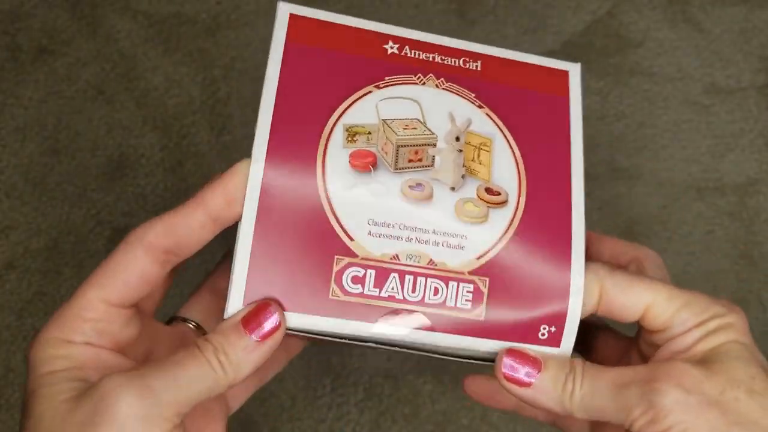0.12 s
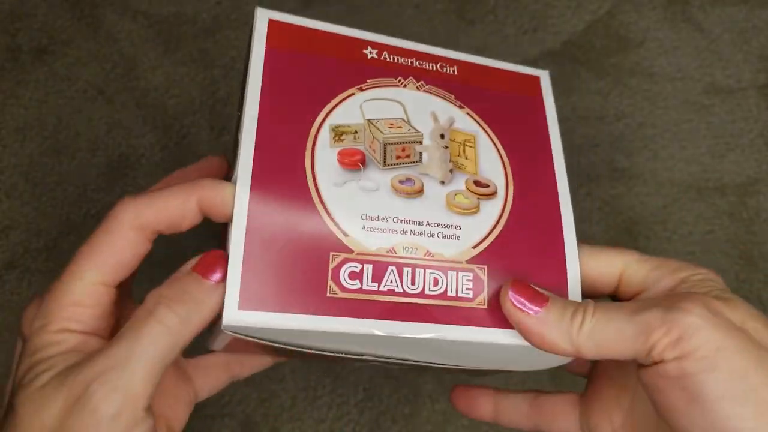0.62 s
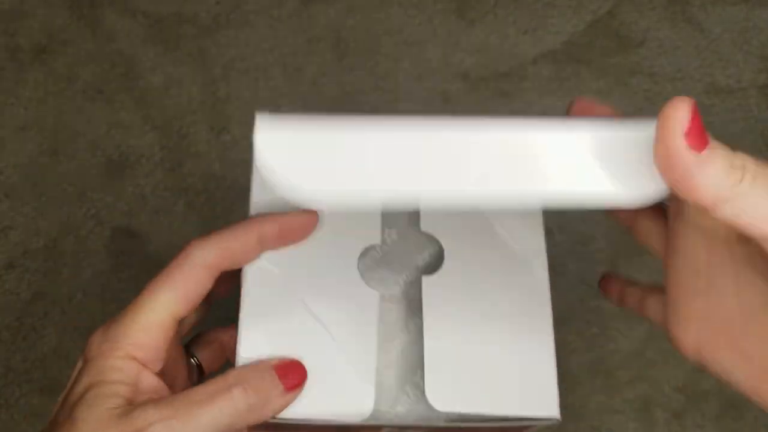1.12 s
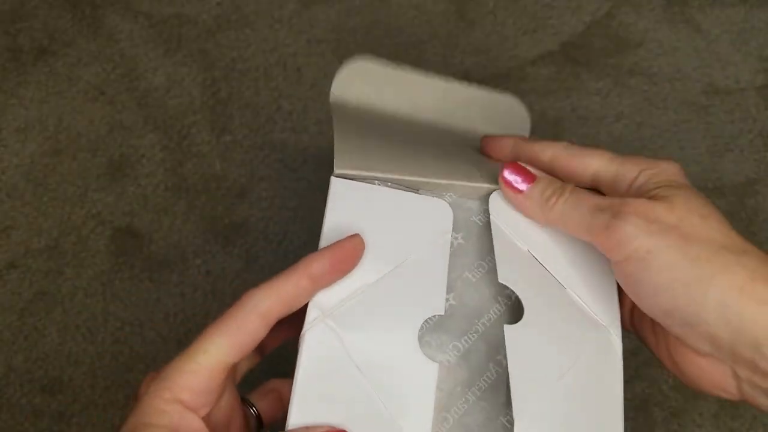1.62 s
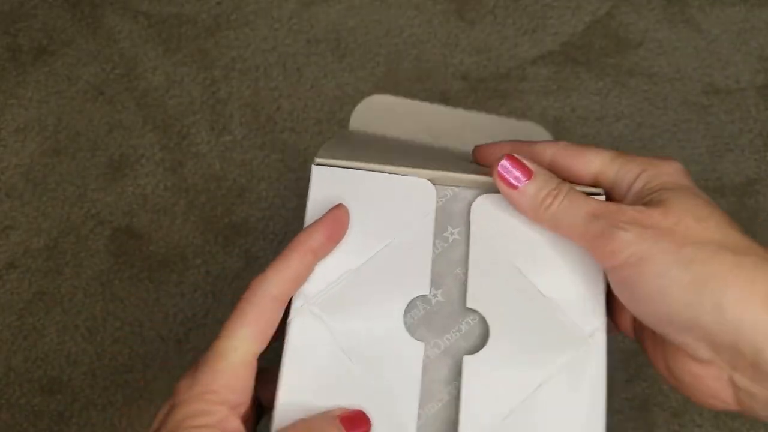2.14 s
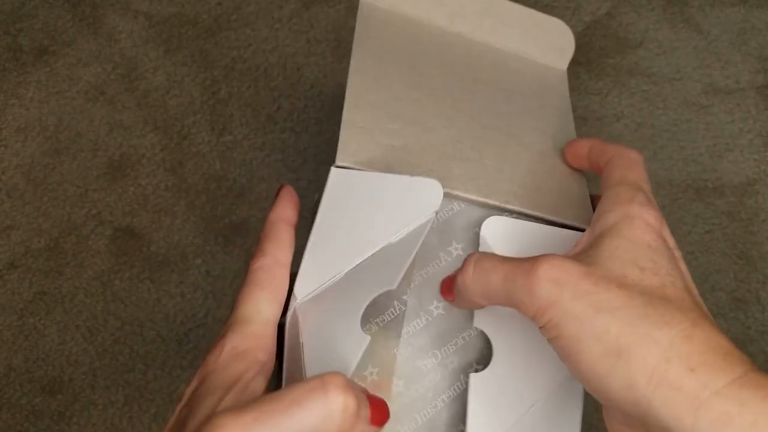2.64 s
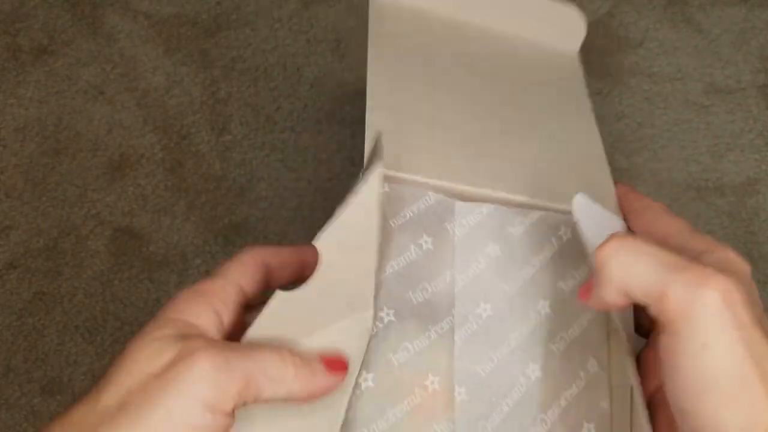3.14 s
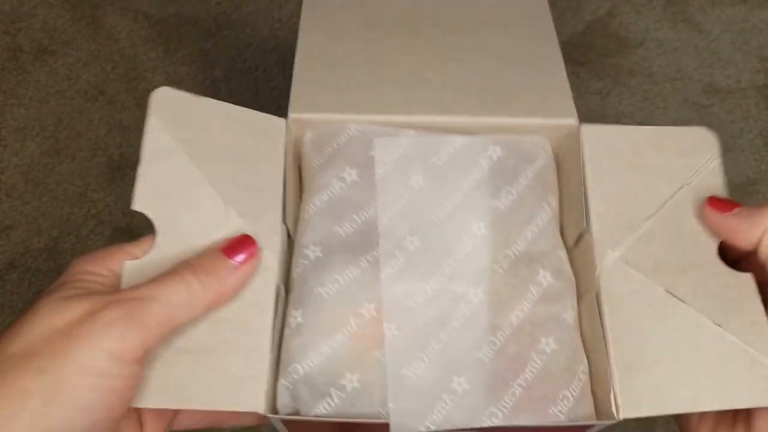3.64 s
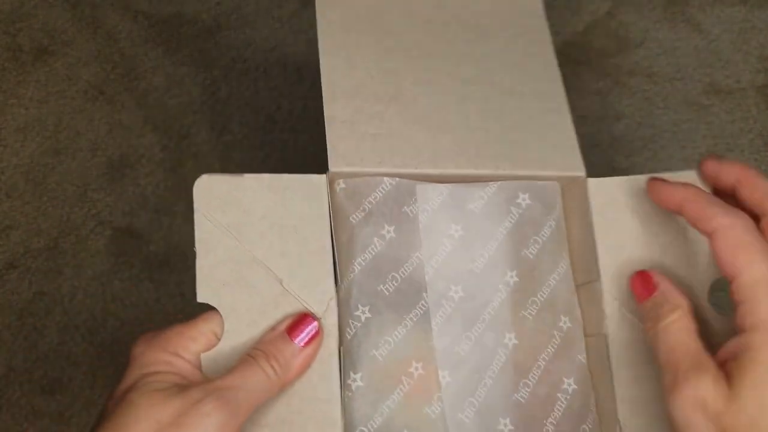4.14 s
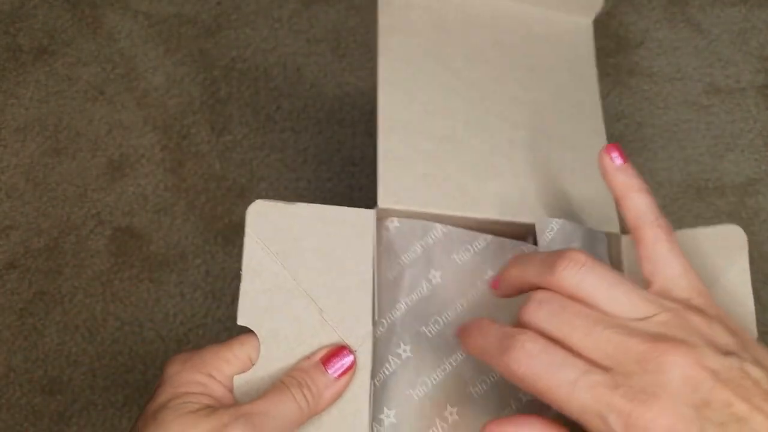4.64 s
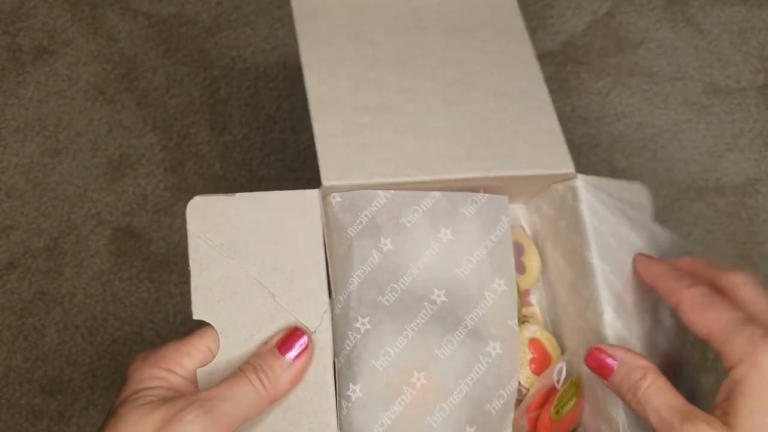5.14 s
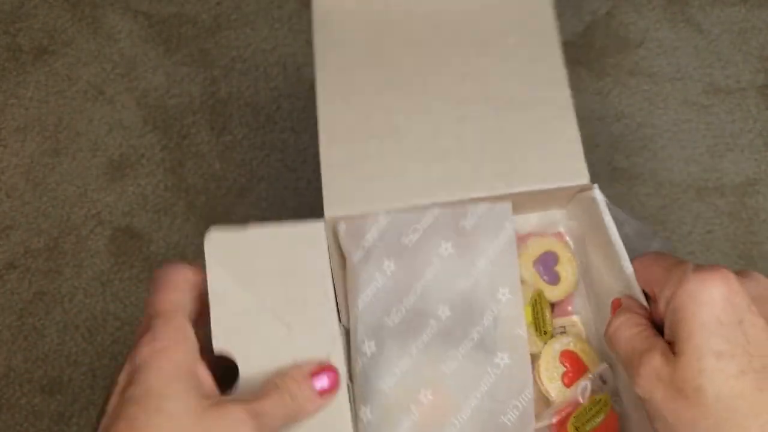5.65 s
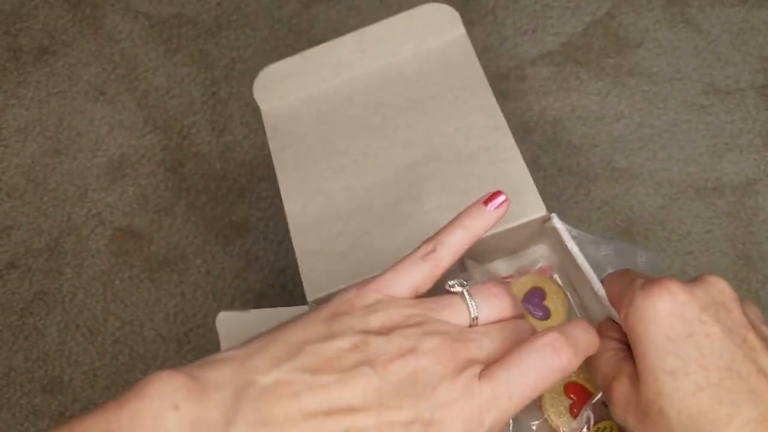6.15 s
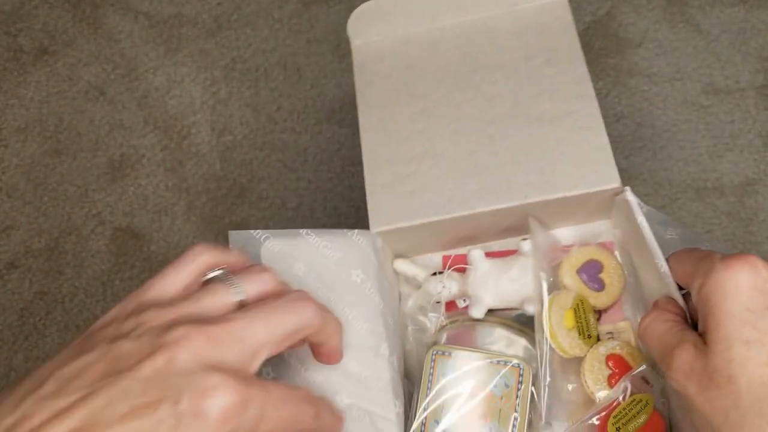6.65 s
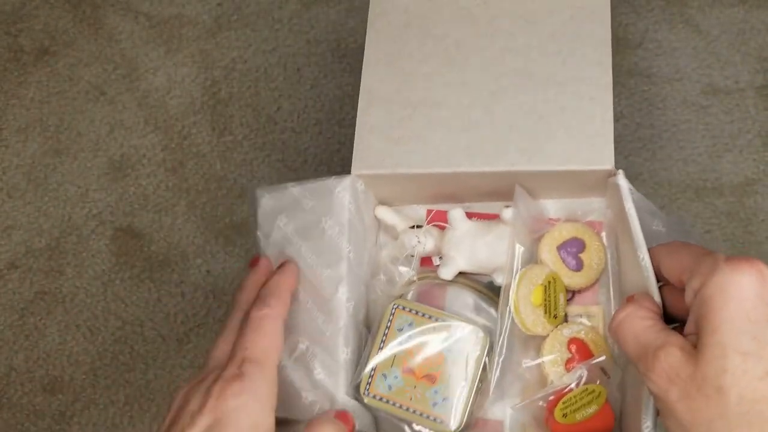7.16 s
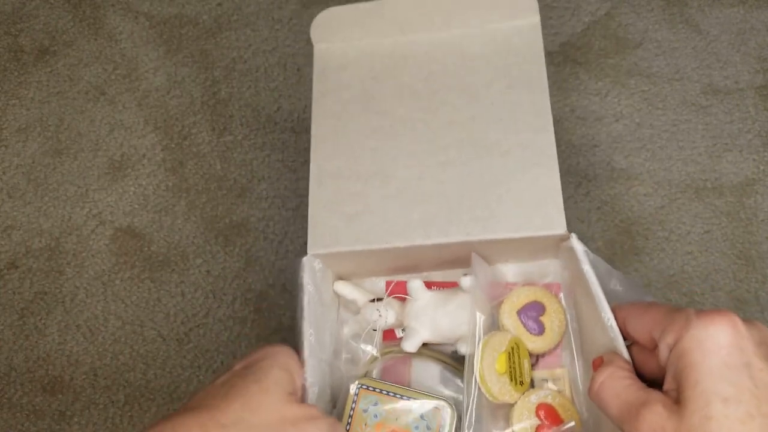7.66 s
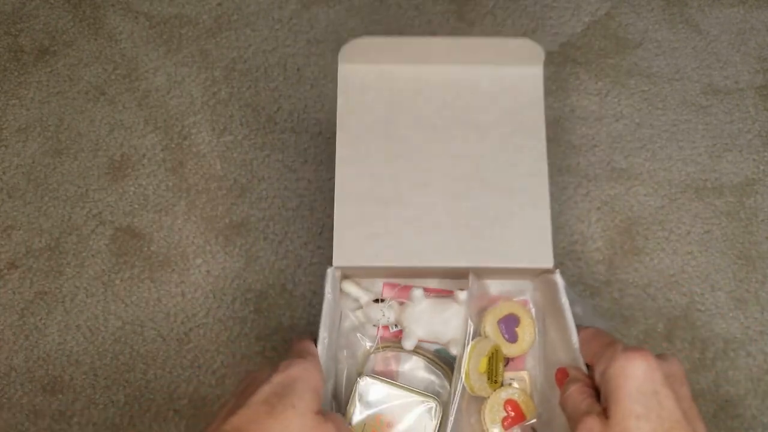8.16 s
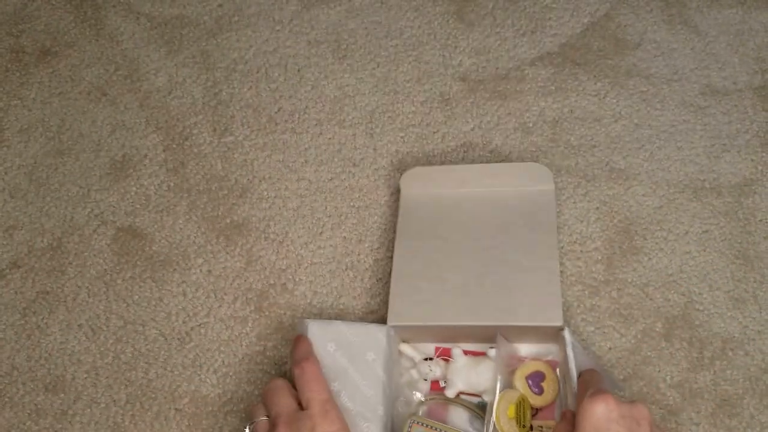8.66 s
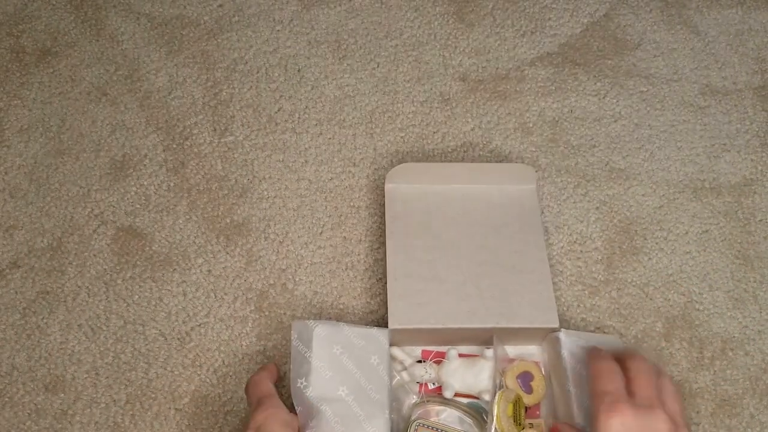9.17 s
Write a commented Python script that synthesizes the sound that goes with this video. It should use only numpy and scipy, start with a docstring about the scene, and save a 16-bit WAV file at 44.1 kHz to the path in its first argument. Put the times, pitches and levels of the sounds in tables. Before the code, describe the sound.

A cardboard lid opens with short dull rubs and sharp hollow snaps, its flaps fold back with papery scrapes, and small creases chirp faintly. Midway the sound turns thinner and brighter as tissue paper crinkles in uneven handfuls, with brief lulls between. Close, dry, left-leaning stereo from a small microphone, with barely any soft-room tail and a quiet bed of hum and hiss.

```python
"""Opening a small cardboard box

Hands open a small cardboard box close to a two-port pocket microphone in a quiet carpeted room.
Card flaps scrape and snap: random buckles and rub drive both the sheet and the hollow box's modes.
Creases squeak as wavering tones and the pumped air thumps as short low swings.
Tissue paper then crinkles, with more crackle and less rub. A faint hum and hiss of shaped noise
lie underneath."""
import sys
import numpy as np
from scipy import signal
from scipy.fft import rfft, irfft, next_fast_len
from scipy.io import wavfile
from scipy.ndimage import uniform_filter1d

SR = 44100
rng = np.random.default_rng(int(sys.argv[2]) if len(sys.argv) > 2 else 0)


def waveform_to_disk(signal):
    """Save audio, clipped to [-1, 1], as 16-bit WAV at the path in sys.argv[1]."""
    frames = np.transpose(np.atleast_2d(signal))
    scaled = np.clip(frames, -1, 1) * 32767
    samples = np.round(scaled).astype(np.int16)
    wavfile.write(sys.argv[1], SR, samples)


def decibels_to_gain(level_db):
    """Convert a level in decibels to a linear amplitude gain (20 dB per decade)."""
    exponent = np.asarray(level_db, float) / 20
    return 10 ** exponent


N = 409688
T = np.arange(N) / SR
SIZE = next_fast_len(N)
HZ = np.fft.rfftfreq(SIZE, 1 / SR)
TISSUE_FROM_S = 4.36  # smooth card mostly rubs; tissue crackles


def evened(x):
    """Scales to rms 1."""
    return x / np.sqrt(np.mean(x ** 2) + 1e-20)


def read(points, hz):
    """Reads a table on a log-frequency axis."""
    f, value = np.transpose(points)
    return np.interp(np.log(hz + 1), np.log(f + 1), value)


def add(mix, s, sound):
    """Mixes a sound in at time s."""
    part = mix[..., round(s * SR):][..., :sound.shape[-1]]
    part += sound[..., :part.shape[-1]]


def causal(gain):
    """Short minimum-phase response, energy 1, for a gain given from 0 Hz to the top."""
    mirrored = np.r_[gain, gain[-2:0:-1]]
    log_gain = np.log(np.maximum(mirrored, 1e-5))
    taps = np.fft.ifft(np.exp(np.conj(signal.hilbert(log_gain)))).real[:len(gain)]
    return taps / np.linalg.norm(taps)


def tail(t60_s, size):
    """A dying burst of random echoes, energy 1."""
    taps = rng.standard_normal(size) * decibels_to_gain(-60 * np.arange(size) / SR / t60_s)
    return taps / np.linalg.norm(taps)


def wander(size, count):
    """Rows of slow chance, rms 1 overall."""
    once = uniform_filter1d(rng.standard_normal((count, N)), size=size)
    return evened(uniform_filter1d(once, size=size))


# Crackle as the microphone colours it. Each row: frequency in Hz, relative level in dB per Hz.
SHEET_COLOUR = [(900, -36), (1700, -8.5), (2400, -0.5), (3700, 0.5), (5500, -0.5), (6800, -9),
                (8080, -13.5), (11000, -3.5), (15700, -7.5), (16100, -67.5)]
# Modes of the hollow box. Each row: frequency in Hz, width in Hz, relative level in dB.
BOX_MODES = [(218, 160, -13.5), (395, 152, -12), (679, 270, -8), (938, 340, -3.5), (1706, 750, -6.5)]


def handling():
    """The same crackle sounds in the sheet and shakes the hollow box, whose modes wander in level at random."""
    steady, bursts = strengths()
    rub_db = np.where(T < TISSUE_FROM_S, 6.0, 0.3)
    force = steady[:, None] * crackle(per_s=1400., spread_db=3.5, rub_db=rub_db)
    force += bursts[:, None] * rng.choice([-1., 1.], (2, N))  # each snap is a burst of random-sign noise

    hz = np.fft.rfftfreq(4096, 1 / SR)
    sheet = decibels_to_gain(read(SHEET_COLOUR, hz))
    treble = 1 / np.sqrt(1 + (7800 / (hz + 1)) ** 12)
    dull = 1 / (1 + (hz / 3200) ** 4)
    bands = np.sqrt(dull), np.sqrt((1 - dull) * (1 - treble ** 2)), treble
    out = np.zeros((2, N))
    for band_force, db, band in zip(force, (-7.5, -.6, 0), bands):
        out += signal.oaconvolve(band_force * decibels_to_gain(db), causal(sheet * band)[None], axes=1)[:, :N]

    swells = wander(size=4000, count=len(BOX_MODES))
    for k, ((f, width_hz, db), swell) in enumerate(zip(BOX_MODES, swells)):
        peak = 1 / (1 + (2 * (hz - f) / width_hz) ** 2) ** 0.85
        mode = -(-1) ** k * causal(peak)  # neighbours swing opposite
        out += signal.oaconvolve(force[3] * decibels_to_gain(db + 2.2 * swell), mode[None], axes=1)[:, :N]
    return drift(out, depth_db=2.4)


# What is touched, against the effort. Each row: time in seconds, thinness of the sheet as
# treble in dB, grip on the box as body in dB.
TOUCH = [(0, -11, -1.5), (.3, -9, -1.5), (.5, -25, -4), (.7, -20, 1.5), (.82, -4, 6), (.86, 0, -1),
         (1.151, -9.5, -5), (1.95, -3.5, -1.5), (2.3, 2.5, -9.5), (2.52, -9.5, -2.5), (2.9, -3, -8.5),
         (3.6, -2.5, -11), (3.85, -8.5, -15), (4.2, -11, -0.5), (4.4, -4, -15), (5.05, 2, -10.5),
         (5.4, 1, -15), (5.7, -7, -8.5), (6.05, -8, -15.5), (6.5, 1, -13.5), (7.1, 1.5, -10.5),
         (8.3, -1.5, -17.5), (8.72, 1.5, -11), (9.2, 1, -15)]
# Sheets buckling or flaps striking. Each row: start in seconds, relative peak in dB.
SNAPS = [(0.0144, -22), (0.2993, -19), (0.6563, -41), (0.8336, -20.5), (1.173, -33.5), (1.2164, -18),
         (1.4543, -35), (1.5822, -31), (1.6099, -26.5), (1.6858, -37.5), (1.7292, -38), (1.776, -35.5),
         (1.8673, -33), (1.8832, -29), (2.0213, -39.5), (2.3775, -27.5), (2.5088, -31), (2.844, -22),
         (2.8512, -20), (2.8906, -27), (3.007, -32.5), (3.036, -29.5), (3.7543, -32), (3.8777, -25),
         (4.226, -33.5), (4.3699, -29), (4.4112, -19.5), (4.4776, -22), (4.4986, -21), (4.556, -26),
         (4.6001, -23.5), (4.887, -20.5), (4.9681, -24.5), (5.0145, -29), (5.0894, -28.5), (5.1214, -25.5),
         (5.1742, -22.5), (5.2822, -30.5), (5.325, -25), (5.3458, -31), (5.3763, -29), (5.6055, -33.5),
         (6.6447, -21.5), (6.674, -25.5), (6.9185, -30), (7.0474, -20), (7.0689, -23), (7.202, -25),
         (7.3262, -25), (7.5745, -27.5), (7.9114, -27), (8.033, -24), (8.376, -22), (8.4275, -33),
         (8.6645, -22), (8.717, -31), (8.7407, -28)]
LID_UNTIL_S = 2.7  # the wide lid rasps lower than the flaps and tissue
CREST_DB = 5  # a snap's listed peak over its force
SNAP_RISE_S, CRACK_T60_S = .0004, 0.0091
SHUDDER_DB, SHUDDER_T60_S = -10.5, 0.038  # a snap cracks, then shudders
TISSUE_SNAP_BODY_DB = -5  # a tissue snap moves the box less


def strengths():
    """Force over time on the sheet's low and high middle, its treble and the box body: steady, and snaps."""
    s, thin_db, grip_db = np.transpose(TOUCH)
    low_db = np.where(T < LID_UNTIL_S, 5.0, 0.3)
    share = decibels_to_gain([low_db, 0 * T, np.interp(T, s, thin_db), np.interp(T, s, grip_db)])
    # buckles clump; colour shifts
    clumps_db = 1.45 * wander(size=200, count=1) + 1.9 * wander(size=900, count=4)
    steady = effort() * decibels_to_gain(clumps_db) * crinkles()

    bursts, t = np.zeros(N), T[:SR // 4]
    decay = decibels_to_gain(-60 * t / CRACK_T60_S) + decibels_to_gain(SHUDDER_DB - 60 * t / SHUDDER_T60_S)
    shape = (1 - np.exp(-t / SNAP_RISE_S)) * decay
    for s, peak_db in SNAPS:
        add(bursts, s, decibels_to_gain(peak_db - CREST_DB) * shape)
    light = decibels_to_gain(np.outer([0.53, 0.068, 0.012, 0.92], TISSUE_SNAP_BODY_DB * (T > TISSUE_FROM_S)))
    return share * steady, share * bursts * light


# Fingers resting on the box between strokes. Each row: time in seconds, effort in dB.
REST = [(0, -57), (.28, -58.5), (.44, -65.5), (1.3, -65.5), (2.2, -61), (2.8, -68.5), (3.3, -70.5),
        (3.8, -73), (4.04, -70), (4.36, -78), (4.45, -52.5), (5.55, -54), (5.94, -82), (6.4, -53.5),
        (8.3, -57), (8.52, -70), (9.1, -57.5)]
# Fingers seize a sheet, which then settles. Each row: peak in seconds, effort in dB,
# settling time to 20 dB down in seconds.
GRABS = [(.285, -42, 0.1), (0.843, -35.5, 0.07), (1.457, -51.5, 0.64), (2.852, -42, 0.13),
         (2.898, -51, 0.32), (4.378, -46.5, 0.36), (4.415, -34.5, 0.22), (4.613, -44, 0.24),
         (5.033, -42.5, 0.01), (5.115, -45.5, 0.02), (5.616, -53.5, 0.22), (6.01, -48.5, 0.23),
         (6.161, -39.5, 0.11), (6.268, -47, 0.2), (6.481, -37, 0.08), (6.544, -41.5, 0.24),
         (6.932, -48.5, 0.14), (7.205, -48.5, 0.16), (7.353, -43.5, 0.02), (8.674, -39, 0.09)]
SEIZE_S = .02  # rise over the last 20 dB
# A sheet slid or folded over, swelling and fading evenly. Each row: middle in seconds,
# effort in dB, reach to 20 dB down in seconds.
SLIDES = [(.19, -54, 0.01), (0.336, -45, 0.0842), (.75, -57.5, 0.18), (1.04, -53, 0.23),
          (1.224, -48.5, 0.05), (1.916, -44, 0.0737), (2.107, -53, 0.15), (2.387, -48, 0.12),
          (2.515, -51, 0.13), (3.049, -46.5, 0.12), (3.533, -46.5, 0.13), (3.747, -54.5, 0.15),
          (3.887, -48.5, 0.09), (4.154, -52, 0.09), (4.502, -41, 0.1348), (4.75, -45, 0.09),
          (4.846, -41.5, 0.16), (5.38, -52, 0.3), (7.09, -41, 0.12), (7.49, -44, 0.09), (7.7, -47, 0.19),
          (7.88, -47.5, 0.07), (8.387, -50.5, 0.13), (8.63, -52, 0.08), (8.8, -46.5, 0.35),
          (8.95, -50, 0.25), (9.21, -55, 0.1)]
ROUNDNESS = 1.52


def effort():
    """How hard the hands work the sheets: resting touch, grabs and slides add up in power."""
    t = T[::32]
    power = decibels_to_gain(np.interp(t, *np.transpose(REST))) ** 2
    for s, db, settle_s in GRABS:
        power = power + decibels_to_gain(db - 20 * np.maximum((t - s) / settle_s, (s - t) / SEIZE_S)) ** 2
    for s, db, reach_s in SLIDES:
        power = power + decibels_to_gain(db - 20 * (abs(t - s) / reach_s) ** ROUNDNESS) ** 2
    return np.interp(T, t, np.sqrt(power))


CRINKLES_PER_S, CRINKLE_DB, CRINKLE_T60_S = 120, 4, .025


def crinkles():
    """Small buckles at random moments briefly lift the force out of the rustle; mean power 1."""
    size = rng.exponential(1, N) * (rng.random(N) < CRINKLES_PER_S / SR)
    decay_power = decibels_to_gain(CRINKLE_DB - 60 * T[:2000] / CRINKLE_T60_S) ** 2
    lift = signal.oaconvolve(size, decay_power)[:N]
    return evened(np.sqrt(1 + abs(lift)))


def crackle(per_s, spread_db, rub_db):
    """Tiny uneven buckles ring dull or bright patches over a soft rub; two rows for two paths to the microphone."""
    happens = rng.random(N) < per_s / SR
    size = decibels_to_gain(spread_db * np.minimum(rng.exponential(1, N), 4)) * happens
    patch, ticks = rng.integers(0, 20, N), np.zeros((2, N))
    for k, hz in enumerate(np.linspace(1500, 16000, 20)):
        ring = np.exp(-T[:40] * hz) * np.cos(2 * np.pi * hz * T[:40])
        for path in ticks:
            echoed = np.convolve(evened(ring), tail(0.004, size=400))
            add(path, 0, signal.oaconvolve(size * (patch == k), echoed))
    rub = decibels_to_gain(rub_db) * rng.standard_normal((2, N))
    return (evened(ticks) + rub) / np.sqrt(1 + decibels_to_gain(rub_db) ** 2)


def drift(x, depth_db):
    """Shifting colour: patches of the spectrum swell and sink at random."""
    z = signal.stft(x, nperseg=256, noverlap=192)[2]
    patches = rng.standard_normal(z.shape[1:])
    for _ in range(2):
        patches = uniform_filter1d(patches, size=7, axis=0)
        patches = uniform_filter1d(patches, size=50, axis=1)
    z = z * decibels_to_gain(depth_db * evened(patches))
    return signal.istft(z, nperseg=256, noverlap=192)[1][:, :N]


# Creases rubbing in stick-slip. Each row: start in seconds, length in seconds, middle pitch in Hz,
# relative level in dB.
SQUEAKS = [(0.75, 0.032, 703, -41.5), (3.724, 0.048, 1695, -45.5), (3.829, 0.05, 1750, -53.5)]


def squeaks():
    """Uneven fast slips give a rough, wavering tone that sags, with an overtone."""
    out = np.zeros(N)
    for s, length_s, hz, db in SQUEAKS:
        t = T[:round(length_s * SR)]
        slow = evened(uniform_filter1d(rng.standard_normal((2, 4000)), size=120))
        waver, flutter = slow[:, :len(t)]
        sag = .015 * (1 - 2 * t / length_s)
        phase = 2 * np.pi * np.cumsum(hz * (1 + .07 * waver + sag)) / SR
        tone = np.sin(phase) + 0.42 * np.sin(2 * phase)
        add(out, s, decibels_to_gain(db + 4.5 * flutter) * np.sin(np.pi * t / length_s) * tone)
    return out


# Flaps and fingers pumping the air in the box. Each row: start in seconds, relative level in dB,
# middle frequency in Hz.
THUMPS = [(.297, -35, 287), (0.654, -45.5, 208), (.832, -34, 215), (1.216, -28.5, 256), (1.451, -43.5, 294),
          (1.877, -46, 306), (2.113, -49, 263), (2.513, -46, 307), (2.843, -30, 145), (3.008, -47, 207),
          (4.14, -47, 300), (4.201, -46, 161)]


def thumps():
    """A low, uneven swing of air and walls that dies in a few cycles."""
    out, t = np.zeros(N), T[:SR // 4]
    for s, db, hz in THUMPS:
        swing = sum(np.sin(2 * np.pi * ratio * hz * t) for ratio in (.62, 1, 1.55))
        swing = swing * np.sin(np.minimum(np.pi * hz * t, np.pi / 2))  # soft start
        add(out, s, decibels_to_gain(db - 60 * t / 0.07) * (1 - np.exp(-t / 0.003)) * swing)
    return out


# Shading of the right port. Each row: frequency in Hz, left over right in dB.
LEFT_OVER_RIGHT = [(60, 5.5), (400, 12.5), (1300, 12), (3300, 20.5), (5800, 21), (9000, 4), (15000, 10.5)]
RIGHT_LATE_S = .00007


def ports(near, other, likeness):
    """The right port is shaded and late, and hears partly by another path."""
    like = np.clip(likeness, 0, 1)
    late = np.exp(-2j * np.pi * HZ * RIGHT_LATE_S)
    right = like * late * rfft(near, SIZE) + np.sqrt(1 - like ** 2) * rfft(other, SIZE)
    return np.array([near, irfft(right / decibels_to_gain(read(LEFT_OVER_RIGHT, HZ)), SIZE)[:N]])


# Colour of hum and hiss. Each row: frequency in Hz, relative level in dB per Hz.
HUSH_COLOUR = [(20, -20), (102, 1), (531, -31), (863, -26.5), (1700, -29.5), (4030, -18.5), (8590, -31),
               (10700, -22), (15900, -27.5), (16200, -72)]


def hush():
    """Low room hum and microphone hiss, as shaped noise that differs more between ports higher up."""
    white = rng.standard_normal((2, SIZE))
    noise = irfft(rfft(white) * decibels_to_gain(read(HUSH_COLOUR, HZ)), SIZE)[:, :N]
    likeness = 0.84 / (1 + (HZ / 500) ** 2) ** .5
    return ports(*(decibels_to_gain(-63) * evened(noise)), likeness)


# Likeness of the two ports' handling sound. Each row: frequency in Hz, likeness from 0 to 1.
LIKENESS = [(100, 1), (700, 0.9), (3000, 0.5), (15000, 0.3)]


def scene():
    """Box and paper, with the short tail of a soft room, over the hush."""
    dry = decibels_to_gain(4.0) * (handling() + squeaks() + thumps())
    room = np.array([signal.oaconvolve(path, tail(.1, size=9000))[:N] for path in dry])
    wet = dry + decibels_to_gain(-11) * room
    return ports(*wet, read(LIKENESS, HZ)) + hush()


def low_pass(x):
    """Removes everything above the highest recorded frequency."""
    return signal.sosfilt(signal.butter(12, 17010, fs=SR, output="sos"), x)


def record(dry):
    """Turns the finished mix into the final output."""
    return low_pass(dry)


dry = scene()
out = record(dry)
waveform_to_disk(out)
```